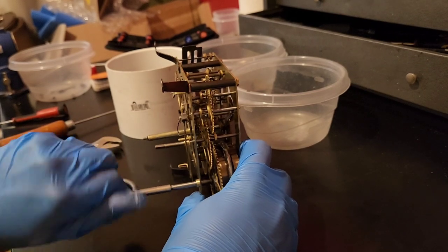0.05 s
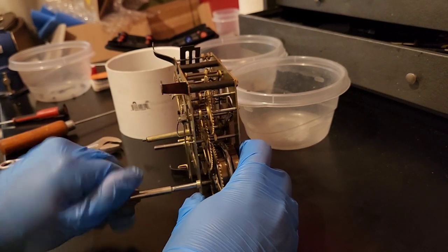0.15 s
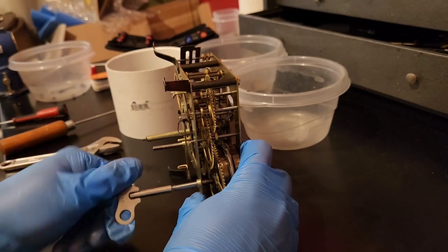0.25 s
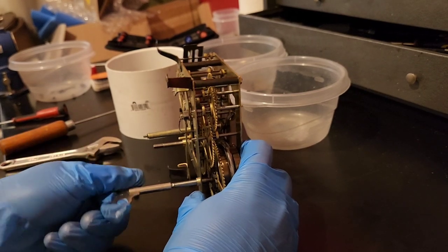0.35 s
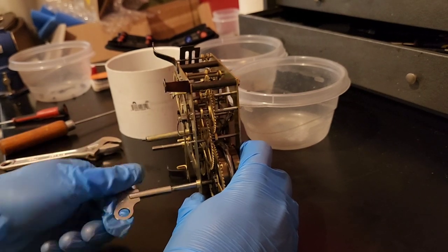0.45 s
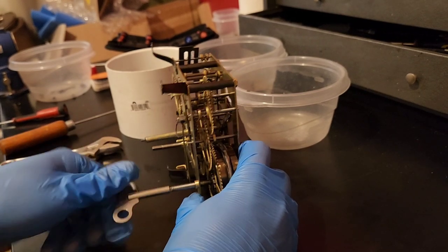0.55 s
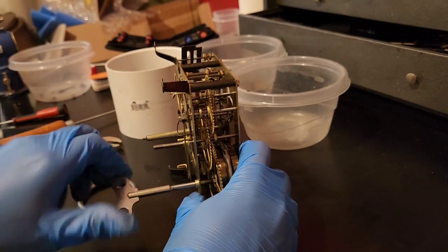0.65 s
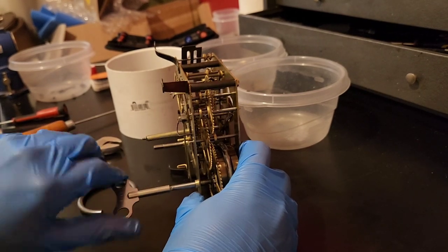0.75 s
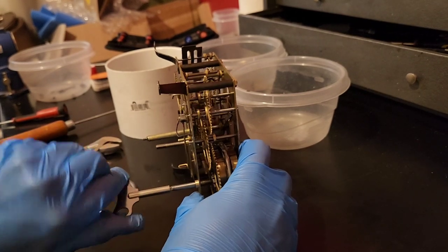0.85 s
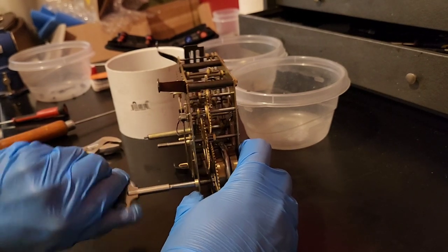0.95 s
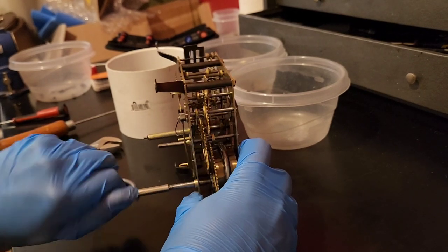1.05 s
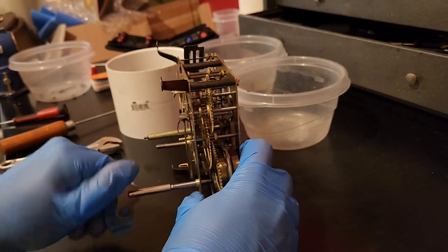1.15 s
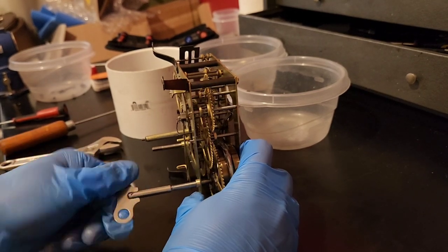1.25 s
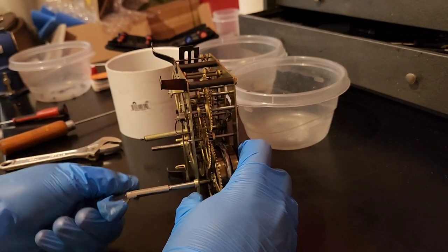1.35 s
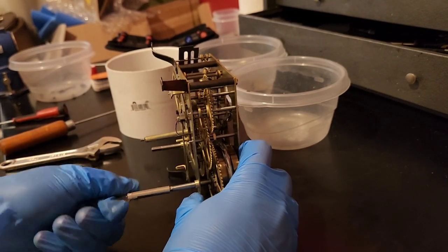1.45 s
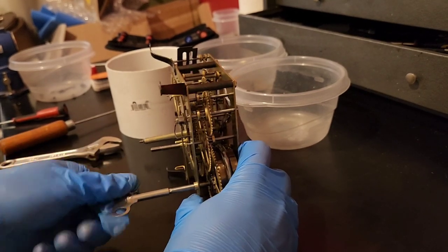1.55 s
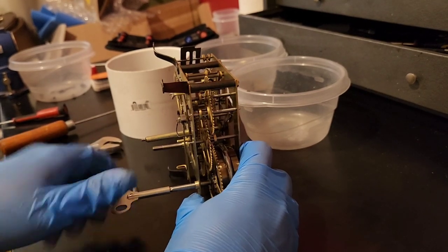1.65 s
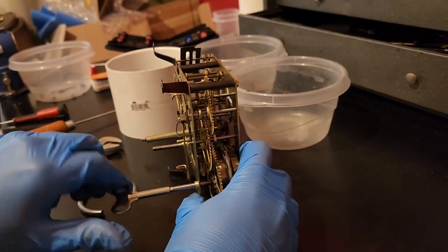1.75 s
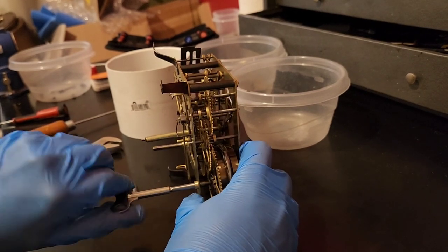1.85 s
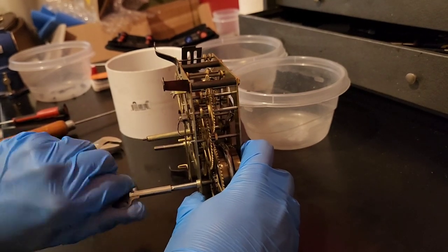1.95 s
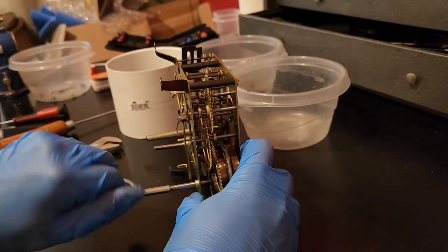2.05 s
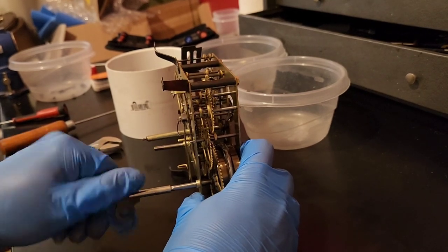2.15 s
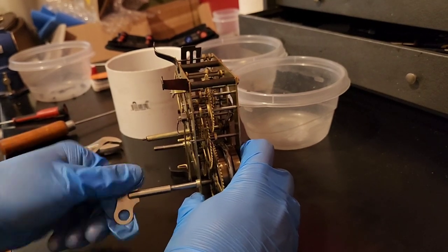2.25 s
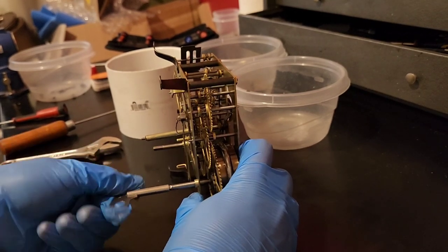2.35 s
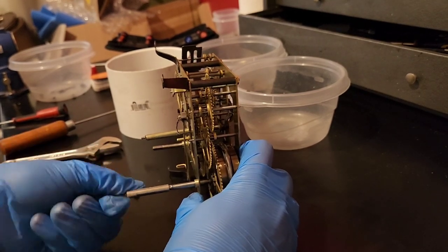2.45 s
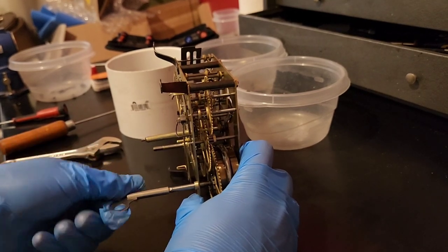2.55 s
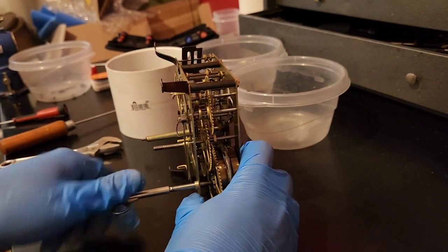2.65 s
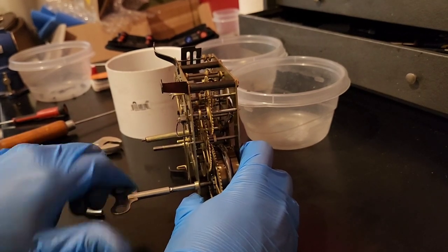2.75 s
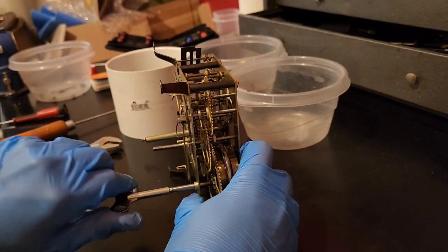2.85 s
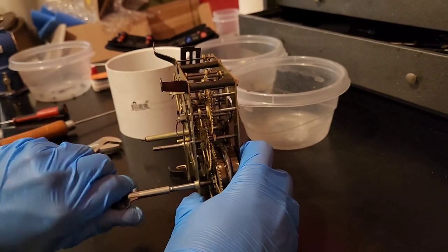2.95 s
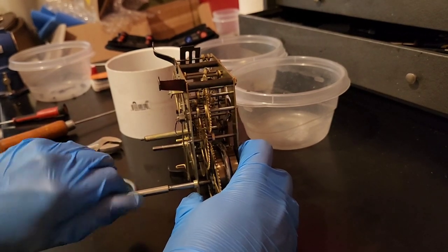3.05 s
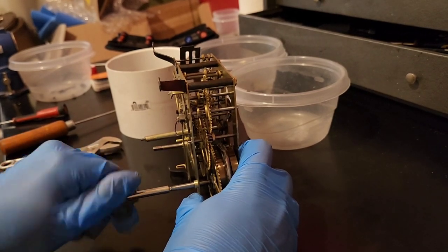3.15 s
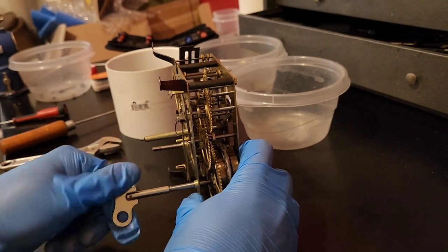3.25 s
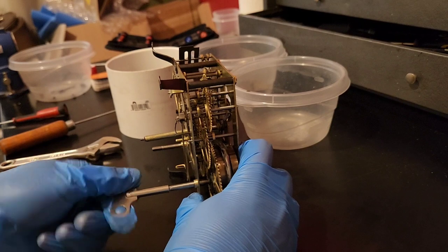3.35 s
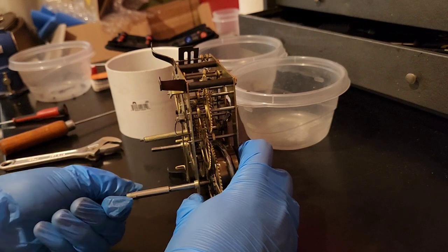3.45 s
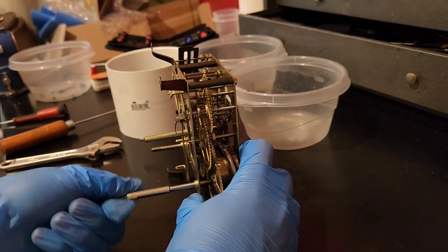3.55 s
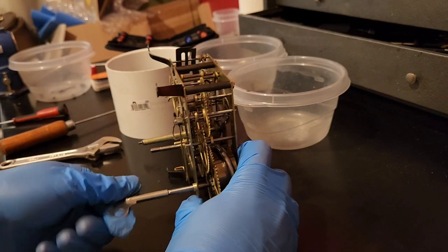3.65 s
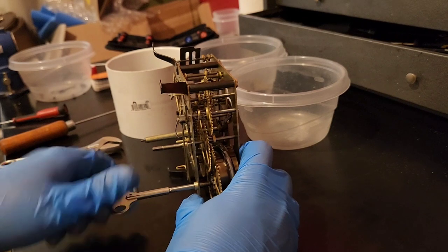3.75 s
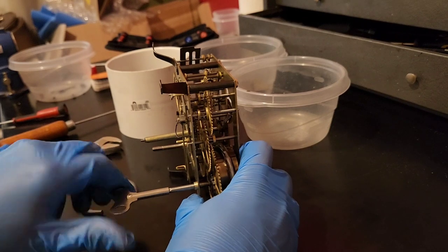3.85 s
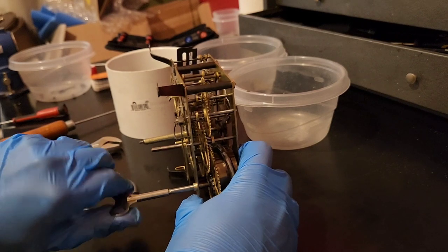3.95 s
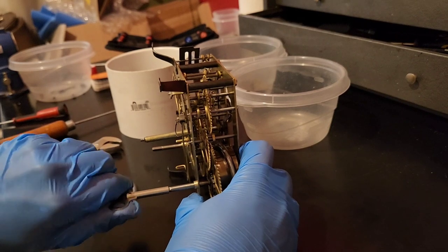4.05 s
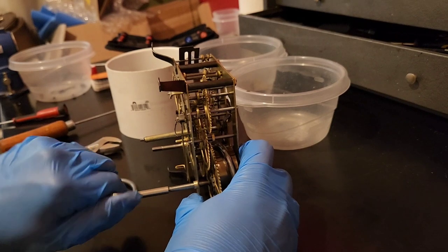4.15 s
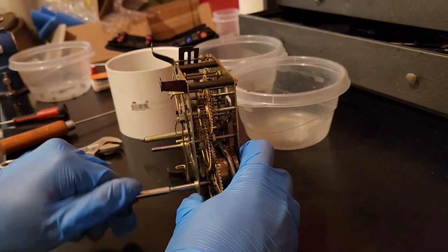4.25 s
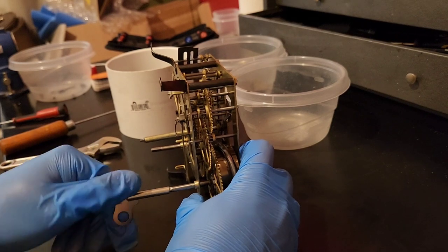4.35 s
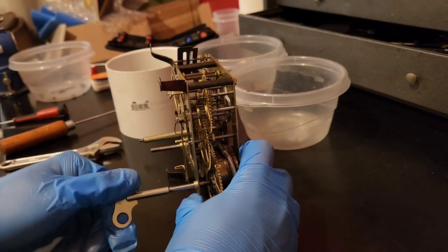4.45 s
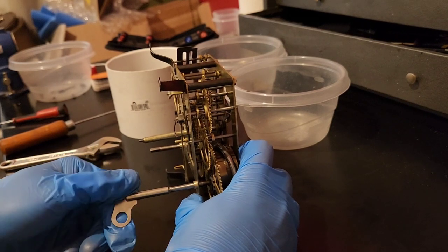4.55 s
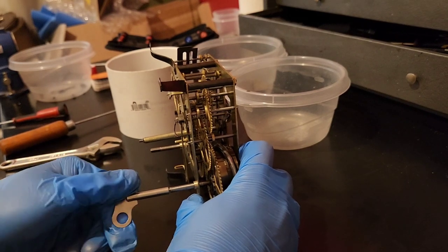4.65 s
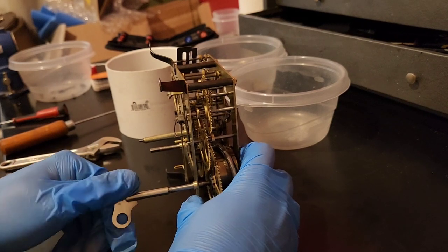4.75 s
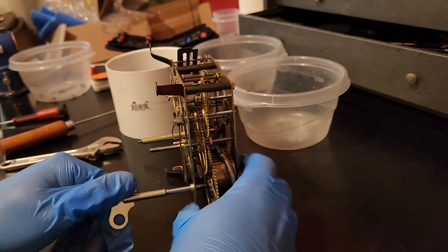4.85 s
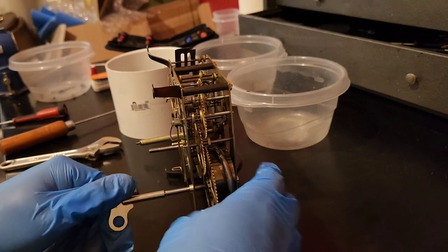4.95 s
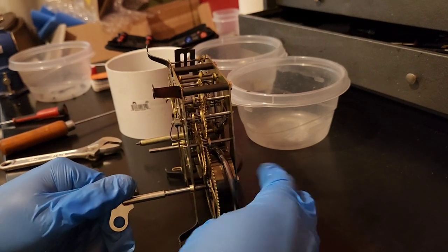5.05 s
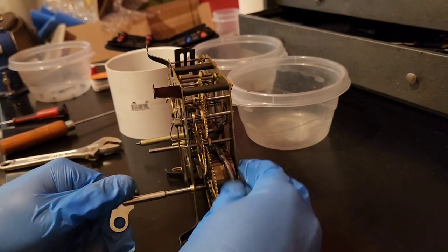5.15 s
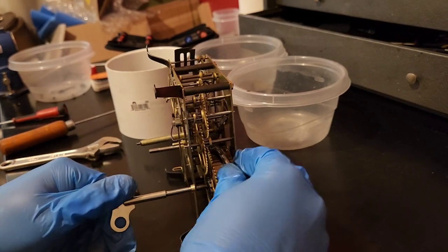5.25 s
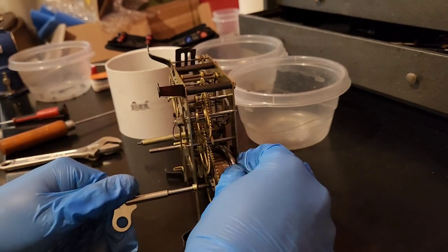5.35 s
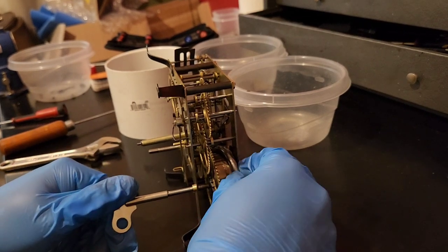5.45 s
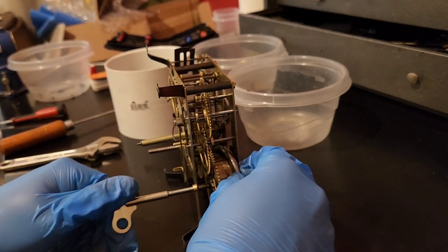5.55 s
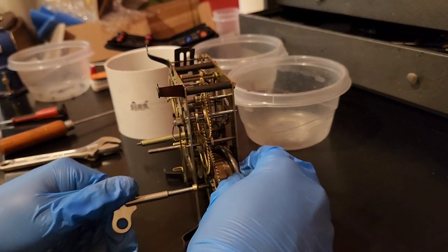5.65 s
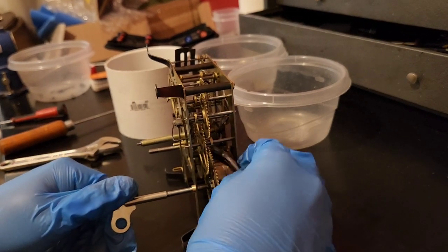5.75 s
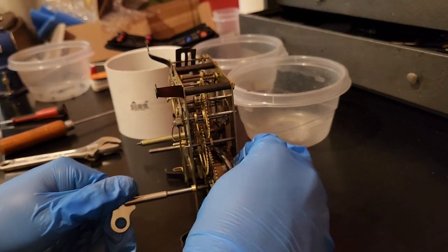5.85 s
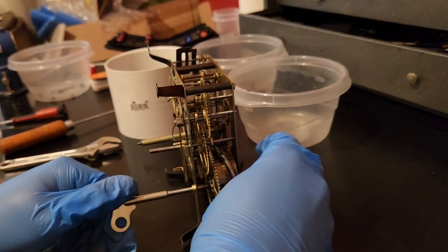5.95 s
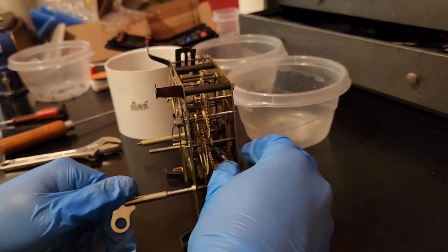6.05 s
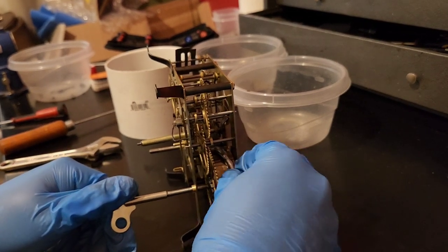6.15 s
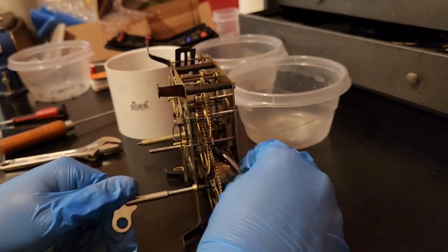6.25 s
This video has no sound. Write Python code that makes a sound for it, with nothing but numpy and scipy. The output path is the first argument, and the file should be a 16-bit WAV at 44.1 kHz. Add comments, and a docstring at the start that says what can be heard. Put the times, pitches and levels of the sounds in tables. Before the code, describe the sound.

A close stereo pickup in a small, quiet workshop with short reverberation, soft air, deep rumble and faint hum. From 0 to 0.3 s, seven bright, crisp ratchet clicks run about twenty per second over a faint arbor grind, with dull bench knocks mixed in; stronger knocks and a loose metal rattle follow until 0.8 s. More click runs come at 1.0-1.4, 2.0-2.4, 3.1-3.4 and a slower one at 4.1-4.5 s. Between them the key clanks on the brass frame and the movement thuds on the bench, notably at 1.6 and 3.7 s. The spring slips sharply at 1.1, 2.5 (hardest) and 3.3 s. Around 4.8 s a glove rubs and squeaks briefly. From 5 s, quieter handling: low frame sway, small clamp ticks near 5.16, a faint sinking squeak to 5.6, a clank and knock at 5.8, then rubber rubbing and light taps to the end.

```python
"""A pawl snaps over ratchet teeth as a brass clock movement is key-wound on a workbench: each tooth is a noise
burst ringing the wheel's resonances. Rough noise bursts make the key's clanks on the frame, the spring's slips
and the glove's faint crinkles; bench modes plus dull noise make the movement's knocks. Late on, a gloved hand
works the steel clamp off the mainspring: damped sine ticks, narrow-band squeaks, rubber rubs. Beneath: the
arbor's grind, small-workshop air, rumble and hum, as filtered noise and a sine."""
import sys
import numpy as np
from scipy import signal
from scipy.fft import rfft, irfft, next_fast_len
from scipy.io import wavfile

SR = 44100
rng = np.random.default_rng(int(sys.argv[2]) if len(sys.argv) > 2 else 0)


def to_wav(s):
    """Save 16-bit WAV."""
    ch = np.atleast_2d(s).T  # columns
    pcm = np.round(np.clip(ch, -1, 1) * 32767)  # PCM
    wavfile.write(sys.argv[1], SR, pcm.astype(np.int16))


N = 277389
T = np.arange(SR // 2) / SR  # s since a contact
CLOCK = np.arange(N) / SR  # s since the start
RELEASE_S = 5.0  # the steadying hand lets go of the movement


def amp(db):
    """Decibels to gain."""
    return 10 ** (np.asarray(db) / 20)


def unit(x):
    """Scaled to rms 1."""
    return x / np.sqrt(np.mean(x ** 2) + 1e-20)


def along(points, hz):
    """(Hz, value) points interpolated on a log frequency axis."""
    f, v = np.transpose(points)
    return np.interp(np.log(hz + 1), np.log(f), v)


def fade(t60_s):
    """Exponential decay after a contact: -60 dB at t60."""
    return np.exp(-np.log(1000) * T / np.maximum(t60_s, 1e-3))


def stroke(start_s, hold_s, attack_s, t60_s):
    """Gesture envelope: linear rise, hold until hold_s after the start, exponential decay."""
    t = CLOCK - start_s
    return np.clip(t / attack_s, 0, 1) * np.exp(-np.log(1000) * np.maximum(t - hold_s, 0) / t60_s)


def jitter(count, step):
    """Random curve: a new normal value every step samples, linear between."""
    knots = rng.standard_normal(count // step + 2)
    return np.interp(np.arange(count) / step, np.arange(count // step + 2), knots)


def filtered(x, response):
    """x through a response given as a function of Hz, zero-padded."""
    n = x.shape[-1]
    m = 2 * next_fast_len(n // 2 + 4096)
    return irfft(rfft(x, m) * response(np.fft.rfftfreq(m, 1 / SR)), m)[..., :n]


def causal(gain):
    """Minimum-phase response with this gain: no sound before a hit."""
    cepstrum = irfft(np.log(np.maximum(gain, 1e-6)))
    half = len(cepstrum) // 2
    cepstrum[1:half] *= 2
    cepstrum[half + 1:] = 0
    return np.exp(rfft(cepstrum))


# left-right correlation: f/Hz, correlation [0-1]
CORRELATION = [(120, .99), (250, 0.97), (500, 0.94), (1000, 0.2), (3000, 0.33), (12000, 0.076)]


def stereo_noise(count):
    """White noise, nearly alike in both channels in the bass, mostly unrelated in the treble."""
    def mid_side_gains(hz):
        angle = np.arccos(np.clip(along(CORRELATION, hz), -1, 1)) / 2
        return np.array([np.cos(angle), np.sin(angle)])
    mid, side = filtered(rng.standard_normal((2, count)), mid_side_gains)
    return np.array([mid + side, mid - side])


def rush(spectrum):
    """Steady coloured stereo noise, rms 1."""
    return unit(filtered(stereo_noise(N), lambda hz: amp(along(spectrum, hz))))


# workshop reverberation: f/Hz, t60/s
WORKSHOP_T60 = [(120, 0.35), (500, 0.45), (1500, 0.28), (5000, 0.24), (10000, 0.19), (16000, 0.23)]


def in_room(hit, wet_db, delay_s=0.0024):
    """Hit plus the workshop's diffuse answer, whose treble dies sooner than its bass."""
    hz, t, bins = signal.stft(stereo_noise(len(T)), SR, nperseg=256)
    decay = np.exp(-np.log(1000) * t / along(WORKSHOP_T60, hz)[:, None])
    tail = signal.istft(bins * decay, SR, nperseg=256)[1][:, :len(T)]
    tail = tail * np.clip(T / delay_s - 1, 0, 1)
    answer = signal.fftconvolve(hit, tail / np.linalg.norm(tail[0]), axes=1)[:, :len(T)]
    return hit + amp(wet_db) * answer


def add(out, s, hit, pan_db):
    """Mix a hit in at s seconds; pan_db is left minus right."""
    part = out[:, max(round(s * SR), 0):][:, :len(T)]
    part += (hit * amp([[pan_db / 2], [-pan_db / 2]]))[:, :part.shape[1]]


# room air spectrum: f/Hz, level/dB (per Hz)
AIR_SPECTRUM = [(20, -12.5), (50, -10), (100, -5), (170, -12.5), (270, -13), (450, -23), (580, -16.5),
                (750, -37.5), (1300, -28.5), (2600, -36.5), (6000, -37), (16000, -53)]


def background(air_db=-62, rumble_db=-57, hum_db=-68, hum_hz=120):
    """Still room air, deep building rumble and faint mains hum: two noises and a sine."""
    rumble = rush([(15, -28.0), (25, -13.5), (30, 2.5), (36, -12.0), (50, -4), (150, -64.5)])
    hum = np.sin(2 * np.pi * hum_hz * CLOCK)
    return amp(air_db) * rush(AIR_SPECTRUM) + amp(rumble_db) * rumble + amp(hum_db) * hum


# frame sway as the hand shifts its weight: t/s, level/dB
SWAY_EVENTS = [(4.43, -45), (5.01, -42.5), (5.075, -43), (5.16, -60), (5.57, -44.5), (6.111, -45)]
# sway spectrum: f/Hz, level/dB (per Hz)
SWAY_SPECTRUM = [(20, -12), (45, 11.5), (72, 10.5), (100, 0.5), (125, -12), (170, -58), (500, -84)]
# rubber glove drags on metal: t/s, length/s, level/dB
RUB_EVENTS = [(2.616, 0.085, -63), (3.636, 0.089, -65), (4.756, 0.18, -57.5), (5, 0.026, -59),
              (5.135, 0.28, -65.5), (5.392, 0.016, -65), (5.771, 0.11, -57.5), (6.181, 0.25, -55.5)]
# glove rub spectrum: f/Hz, level/dB (per Hz)
GLOVE_SPECTRUM = [(300, -22), (700, -23), (1300, 3), (2500, -5), (4000, -2), (4800, -0.5), (5600, -1),
                  (10000, -6), (16000, -16)]
SWAY_ATTACK_S, SWAY_T60_S = 0.016, 0.51
RUB_ATTACK_S, RUB_T60_S = 0.0087, 0.098


def hand(sway_db=-1, rub_db=-1, stick_db=2.2):
    """The gloved hand shifts its grip: low noise as the frame sways, uneven noise as rubber drags."""
    sway = sum(amp(db) * stroke(s, SWAY_ATTACK_S, SWAY_ATTACK_S, SWAY_T60_S) for s, db in SWAY_EVENTS)
    drag = sum(amp(db) * stroke(s, length_s, RUB_ATTACK_S, RUB_T60_S) for s, length_s, db in RUB_EVENTS)
    stick = unit(amp(stick_db * (jitter(N, step=120) + jitter(N, step=1100) / 2)))
    return amp(sway_db) * sway * rush(SWAY_SPECTRUM) + amp(rub_db) * drag * stick * rush(GLOVE_SPECTRUM)


# steel and rubber dragged until they sing: start t/s, end t/s, start f/Hz, end f/Hz, width/Hz, level/dB
SQUEAK_EVENTS = [(4.764, 4.817, 2600, 2560, 130, -55), (5.164, 5.594, 2117, 1800, 263, -68)]


def squeaks():
    """Friction excites one narrow resonance that sinks as the part slides: noise on a gliding carrier."""
    out = np.zeros((2, N))
    for start_s, end_s, start_hz, end_hz, width_hz, db in SQUEAK_EVENTS:
        glide_hz = np.interp(CLOCK, [start_s, end_s], [start_hz, end_hz])
        phase = 2 * np.pi * np.cumsum(glide_hz) / SR
        a, b = filtered(rng.standard_normal((2, 2, N)), lambda hz: 1 / (1 + (2 * hz / width_hz) ** 2))
        pressure = np.interp(CLOCK, [start_s, start_s + 0.0043, (start_s + end_s) / 2, end_s], [0, 1, 1, 0])
        out += amp(db) * pressure * unit(a * np.sin(phase) + b * np.cos(phase))
    return out


# fingertip flicks the clamp: t/s, level/dB
CLAMP_TICK_EVENTS = [(5.157, -38), (5.174, -45)]
# clamp modes: f/Hz, level/dB, t60/s
CLAMP_MODES = [(1600, 2, 0.015), (1820, 2.5, 0.013), (2200, -5, 0.016), (3630, -1, 0.02)]


def clamp(level_db=-1):
    """The clamp, still tight on the spring, gives short damped ticks: decaying sines, random phases."""
    out = np.zeros((2, N))
    for s, db in CLAMP_TICK_EVENTS:
        ring = np.zeros((2, len(T)))
        for hz, mode_db, t60_s in CLAMP_MODES:
            ring += amp(mode_db) * fade(t60_s) * np.sin(2 * np.pi * (hz * T + rng.random((2, 1))))
        add(out, s, amp(db + level_db) * in_room(ring * np.minimum(T / .0006, 1), wet_db=-13), 0)
    return out


# bench with the movement on it, modes: f/Hz, level/dB, t60/s
BENCH_MODES = [(75.6, -7.5, 0.15), (110.3, 1, 0.067), (122.6, 7.5, 0.12), (152, 10.5, 0.036),
               (199.8, 0, 0.2), (238.7, -7.5, 0.2), (269, -7, 0.17), (359, 1, 0.11), (463, -14, 0.031),
               (515.6, -8.5, 0.29), (588, 4.5, 0.07), (619.3, 5.5, 0.039), (684.4, -1, 0.047),
               (761, -18, 0.15), (905, -8.5, 0.037), (1023, -11.5, 0.15), (1235, -13, 0.079),
               (1452, -6, 0.054), (1559, -16.5, 0.2), (1960, -6.5, 0.024), (2212, -16, 0.13)]
BENCH_HZ = np.array([hz for hz, db, t60_s in BENCH_MODES])
BENCH_RINGS = np.array([np.exp((2j * np.pi * hz - np.log(1000) / t60_s) * T) for hz, db, t60_s in BENCH_MODES])


def bench(gain_db, scatter_db=1.2):
    """Bench modes ring and decay; the high ones are out of step between the channels."""
    hz, mode_db, t60_s = np.transpose(BENCH_MODES)
    polarity = (-1) ** np.arange(len(hz))
    gain = polarity * amp(mode_db + gain_db + rng.normal(0, scatter_db, len(hz)))
    spread = 0.49 * np.arccos(np.clip(along(CORRELATION, hz), -1, 1))
    phase = spread * rng.standard_normal((2, len(hz)))
    return ((gain * np.exp(1j * phase)) @ BENCH_RINGS).imag


# dull clatter of a knock: f/Hz, level/dB (per Hz)
THUD_SPECTRUM = [(45, 6.5), (100, 13.5), (300, 7.5), (750, 15), (1500, 0), (2300, -5.5), (4000, -10.5),
                 (12000, -21)]


def thump(s, bass_db, hard_db, body_db, thud_db=-1.5, crack_db=5, crack_t60_s=0.015, wet_db=-8.0, free_db=9):
    """A blow on the bench: dull crack, clatter and modes; a harder blow rings the higher modes more."""
    frame_db = free_db * (s > RELEASE_S)  # hand off: the frame's low mode, near 266 Hz, is freer
    tilt = [(130, bass_db + 2.0), (200, bass_db - 1.0), (266, frame_db), (330, 0.0094), (560, 0.0031),
            (780, body_db), (1250, hard_db - frame_db / 4)]
    dull = lambda hz: causal(amp(along(tilt, hz) + along(THUD_SPECTRUM, hz)))
    clatter = amp(thud_db) * fade(0.14) + amp(crack_db) * fade(crack_t60_s)
    thud = filtered(clatter * stereo_noise(len(T)), dull)
    modes = bench(along(tilt, BENCH_HZ), scatter_db=1.08)
    return in_room((modes + thud) * np.minimum(T / 0.0005, 1), wet_db)


def rattle(body, t60_s, mid_db, top_db, wet_db, rough_db=4.5):
    """Metal slips on metal: rough noise, as of tiny impacts, rings the body."""
    swell = np.minimum(T / (t60_s / 25), 1) * fade(t60_s)
    grains = swell * amp(rough_db * jitter(len(T), step=64))
    grains = grains * np.linalg.norm(swell) / np.linalg.norm(grains)
    tilt = [(3500, mid_db), (7000, 0.0062), (10000, 0.007), (13500, top_db)]
    colour = lambda hz: causal(amp(along(body, hz) + along(tilt, hz)))
    return in_room(filtered(grains * stereo_noise(len(T)), colour), wet_db)


KEY_TOP_DB, CLAMP_TOP_DB = -0.5, -4  # frame rattle top treble: key brighter than clamp


def frame_top_db(s):
    """The key shakes the frame until the hand lets go, the clamp afterwards."""
    return KEY_TOP_DB if s < RELEASE_S else CLAMP_TOP_DB


# movement rocks and lands on the bench: t/s, level/dB, bass level/dB
KNOCK_EVENTS = [(.056, -24.5, -2.5), (.181, -28, -3), (0.415, -22, -5), (.558, -24.5, 3.5),
                (0.785, -43.5, 5.5), (0.822, -38.5, 0.5), (.9635, -26.5, -1.5), (1.11, -24.5, -3),
                (1.446, -34, 4), (1.515, -29.5, -3.5), (1.597, -21.5, -1), (1.871, -29.5, -3.5),
                (2.477, -27, -5), (2.498, -28, -5), (2.717, -35, 2), (3.329, -32, -3.5),
                (3.657, -33.5, -3.5), (3.722, -24.5, -2.5), (3.981, -31, 0), (4.68, -42, -5),
                (4.81, -31.5, -1), (5.416, -46, -6), (5.7, -43.5, 0), (5.79, -29.5, -12.5),
                (6.121, -46, -19), (6.222, -40, -9)]
ROCK_BACK_S, ROCK_BACK_DB = .056, -21  # settles on the other corner
SHAKE_S, SHAKE_DB = 0.0086, -18  # loose wheels rattle
BRIGHTEN_DB_PER_DB = 0.42  # extra treble per dB of knock level


def knocks(level_db=-5, typical_db=-28):
    """The movement lands on the bench, shakes its loose wheels, rocks back; stronger is brighter."""
    out = np.zeros((2, N))
    for s, db, bass_db in KNOCK_EVENTS:
        hard_db = -3.5 + BRIGHTEN_DB_PER_DB * (db - typical_db)
        landing = thump(s, bass_db, hard_db, body_db=-3.5)
        wheels = rattle(FRAME_SPECTRUM, t60_s=0.042, mid_db=4.0, top_db=frame_top_db(s), wet_db=-2.0)
        rock_back = thump(s, bass_db, hard_db=1, body_db=-4.5)
        add(out, s, amp(db + level_db) * landing, 0)
        add(out, s + SHAKE_S, amp(db + hard_db / 2 + SHAKE_DB) * wheels, 1.5)
        add(out, s + ROCK_BACK_S, amp(db + level_db + ROCK_BACK_DB) * rock_back, 0)
    return out


# mainspring coils slip under the key; the last three rows, faint, are the glove's crinkles: t/s, level/dB,
# rattle t60/s
SLIP_AND_CRINKLE_EVENTS = [(0.378, -27.5, 0.1), (1.135, -19, 0.018), (2.497, -11.5, 0.014), (2.502, -32.5, 0.079),
                           (3.3238, -28.5, 0.023), (3.328, -15, 0.027), (3.335, -23.5, 0.14), (5.027, -47.5, 0.043),
                           (5.069, -46.5, 0.031), (5.682, -47.5, 0.035)]
# coiled spring: f/Hz, level/dB (per Hz)
SPRING_SPECTRUM = [(100, -35.5), (400, -0.5), (1500, -4), (2300, -2), (3300, 1), (4300, 1), (5000, 6),
                   (5500, 9), (6100, 0.5), (6900, 1), (7700, 7.5), (8700, 4.5), (12000, -1), (15500, -3)]


def slips_and_crinkles(level_db=3.5, pan_db=.5):
    """Coil jerks over coil and the whole spring rings: rough noise in the spring's colour; the same noise,
    faint, makes the glove's late crinkles."""
    out = np.zeros((2, N))
    for s, db, t60_s in SLIP_AND_CRINKLE_EVENTS:
        ring = rattle(SPRING_SPECTRUM, t60_s, mid_db=-2, top_db=2.6, wet_db=-5.0)
        add(out, s, amp(db + level_db) * ring, pan_db)
    return out


# key or clamp strikes the brass frame: t/s, level/dB, rattle t60/s
CLANK_EVENTS = [(.005, -35, 0.03), (.915, -37, 0.033), (.97, -41.5, 0.025), (1.441, -37.5, .05),
                (1.513, -40, 0.037), (1.821, -46, 0.031), (1.962, -35, 0.03), (2.463, -38, 0.13),
                (2.982, -34, 0.021), (3.525, -34, 0.025), (3.984, -41, 0.024), (4.05, -34, 0.021),
                (4.617, -36.5, 0.022), (5.271, -44, 0.011), (5.311, -40.5, 0.034), (5.774, -36, 0.034),
                (5.791, -34, 0.06), (6.206, -42.5, 0.032)]
# brass frame: f/Hz, level/dB (per Hz)
FRAME_SPECTRUM = [(100, -34.5), (400, 10.5), (1400, -4.5), (2200, 5.5), (3000, 3.5), (4400, 0), (5500, 5),
                  (6700, 4.5), (7700, 6), (10000, 4.5), (15000, 6), (17000, -12)]


def clanks(level_db=2.5, mid_db=2, pan_db=1.5, jolt_db=-7):
    """Steel strikes the frame, which rattles and passes a light, hard jolt to the bench."""
    out = np.zeros((2, N))
    for s, db, t60_s in CLANK_EVENTS:
        ring = rattle(FRAME_SPECTRUM, t60_s, mid_db, frame_top_db(s), wet_db=-2.5)
        jolt = thump(s, bass_db=-9.5, hard_db=6, body_db=-5)
        add(out, s, amp(db + level_db) * ring, pan_db)
        add(out, s, amp(db + jolt_db) * jolt, 0)
    return out


# arbor in its bearings: f/Hz, level/dB (per Hz)
GRIND_SPECTRUM = [(150, -14.5), (350, -3), (600, 0), (900, -8.5), (2200, -11), (6000, -13.5),
                  (15000, -21.5)]


def arbor(level_db=-51, fade_db_per_turn=3.5, rough_db=4):
    """The loaded arbor grinds softly while the key turns, less with every turn: rough noise."""
    turning = np.zeros(N)
    for turn, teeth_s in enumerate(TURN_TEETH_S):
        hold = stroke(teeth_s[0], teeth_s[-1] - teeth_s[0], attack_s=0.024, t60_s=0.26)
        turning += amp(-fade_db_per_turn * turn) * hold
    grains = unit(amp(rough_db * jitter(N, step=110)))
    return amp(level_db) * turning * grains * rush(GRIND_SPECTRUM)


# pawl drops off a tooth; one row per turn of the key: t/s of each tooth
TURN_TEETH_S = [(.0598, .1105, .1669, .2033, .2394, .2751, .3197),
                (1.0152, 1.059, 1.0971, 1.1751, 1.2212, 1.265, 1.3106, 1.3844),
                (2.044, 2.0914, 2.1432, 2.1945, 2.2433, 2.2893, 2.3347, 2.4175),
                (3.0729, 3.1185, 3.168, 3.2157, 3.275, 3.3717, 3.4233),
                (4.137, 4.2056, 4.2895, 4.3767, 4.4796)]
# pawl and ratchet wheel resonances: f/Hz, width/Hz, level/dB
RATCHET_MODES = [(516, 220, -18.5), (1300, 110, -10), (2210, 355, -2), (2310, 160, -7), (4020, 1700, -6),
                 (5560, 430, -9.5), (6220, 700, -2.5), (7650, 450, 6.5), (9090, 1250, 6), (10640, 970, 3.5),
                 (11700, 800, -4.5), (12250, 640, 7.5), (13900, 740, 5.5)]
TOOTH_DB, TOOTH_PAN_DB = -24.5, 2.5  # mean click level; left minus right
MID_TURN_DB = 1  # swell toward mid-turn
LIMP_DB, LIMP_PAN_DB = 0.55, 0.4  # +/- on alternate clicks: the stronger lies further left
TIGHTEN_DB_PER_TURN = 0.9  # tighter spring, stronger pawl knock near 2 kHz
TOOTH_BENCH_DB = -46  # nudge to the bench


def ratchet(chatter_s=0.0014, rise_s=0.0016, ring_t60_s=0.016, ring_db=-28, rough_db=1.0, wet_db=-5.5):
    """The pawl chatters onto each tooth for a few ms; every tooth rings the wheel a little differently."""
    out = np.zeros((2, N))
    hz, width_hz, mode_db = np.transpose(RATCHET_MODES)[..., None]
    hold = np.minimum(fade(ring_t60_s) * np.exp(np.log(1000) * chatter_s / ring_t60_s), 1)
    blow = np.minimum(T / rise_s, 1) * hold
    for turn, teeth_s in enumerate(TURN_TEETH_S):
        tension_db = along([(1200, 0.064), (2200, TIGHTEN_DB_PER_TURN * turn), (4000, 0.04)], hz)
        for k, s in enumerate(teeth_s):
            strength = amp(mode_db + tension_db + 1.4 * rng.standard_normal(hz.shape))

            def steel(f):
                peaks = strength / (1 + (1.54 * (f - hz) / width_hz) ** 2)
                return causal(unit(np.sqrt(np.sum(peaks ** 2, axis=0))))

            grains = unit(amp(rough_db * jitter(len(T), step=24)))
            burst = (blow + amp(ring_db) * fade(0.068)) * grains
            snap = filtered(burst * stereo_noise(len(T)), steel)
            snap = unit(snap) * np.sqrt(.002 / T[-1])  # energy of 2 ms at rms 1
            limp = (-1) ** k
            db = TOOTH_DB + MID_TURN_DB * np.sin(np.pi * k / (len(teeth_s) - 1)) + LIMP_DB * limp
            add(out, s, amp(db) * in_room(snap, wet_db), TOOTH_PAN_DB + LIMP_PAN_DB * limp)
            nudge = bench(along([(150, -7), (350, -6.5), (600, -5), (1500, 3)], BENCH_HZ))
            add(out, s, amp(TOOTH_BENCH_DB) * nudge, 0)
    return out


def scene():
    """Sum of all sources on the bench and the room behind them."""
    bed = background() + hand()
    clamp_work = squeaks() + clamp()
    return bed + clamp_work + knocks() + slips_and_crinkles() + clanks() + arbor() + ratchet()


TOP_HZ = 15900  # band limit


def record(dry, lead_s=.00009, shade_db=3):
    """Left channel slightly earlier and brighter; steep cut above the band limit."""
    side = np.array([[.5], [-.5]])

    def ports(hz):
        shade = amp(side * along([(7000, 0), (13000, shade_db)], hz))
        return np.exp(2j * np.pi * hz * lead_s * side) * shade

    return filtered(dry, lambda hz: ports(hz) / np.sqrt(1 + (hz / TOP_HZ) ** 200))


dry = scene()
out = record(dry)
to_wav(out)
```